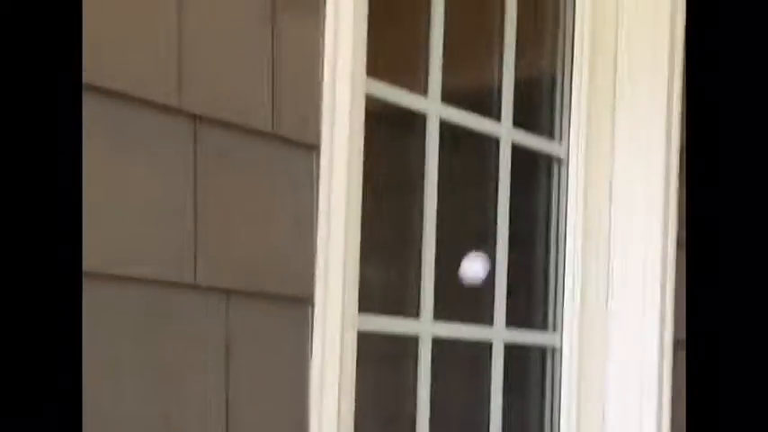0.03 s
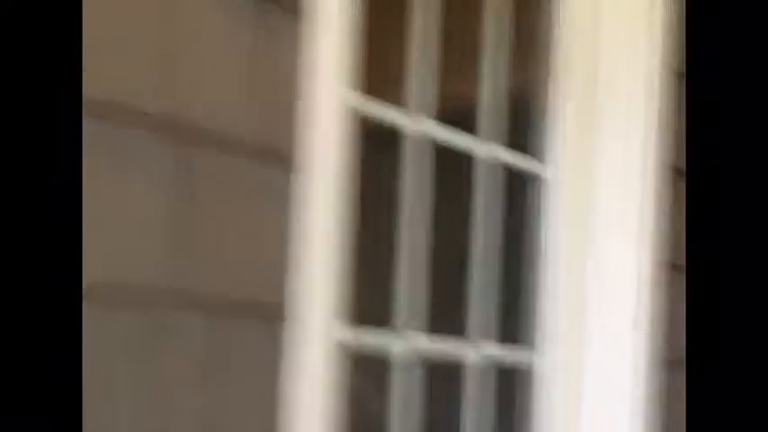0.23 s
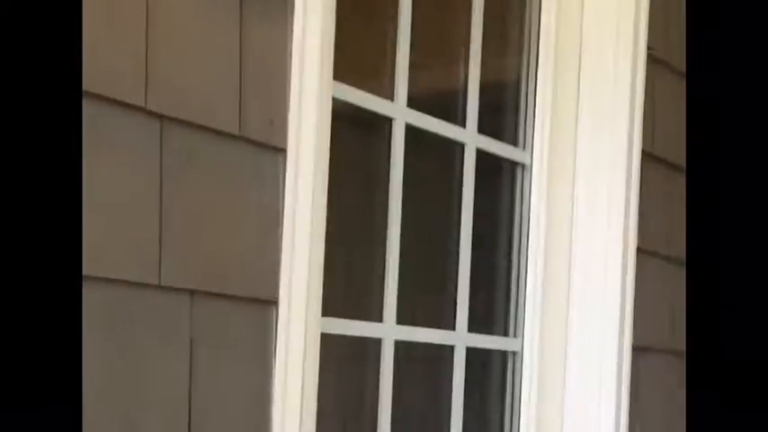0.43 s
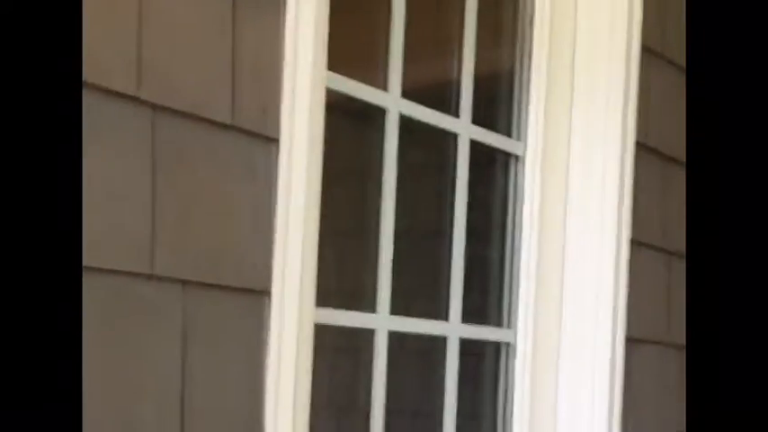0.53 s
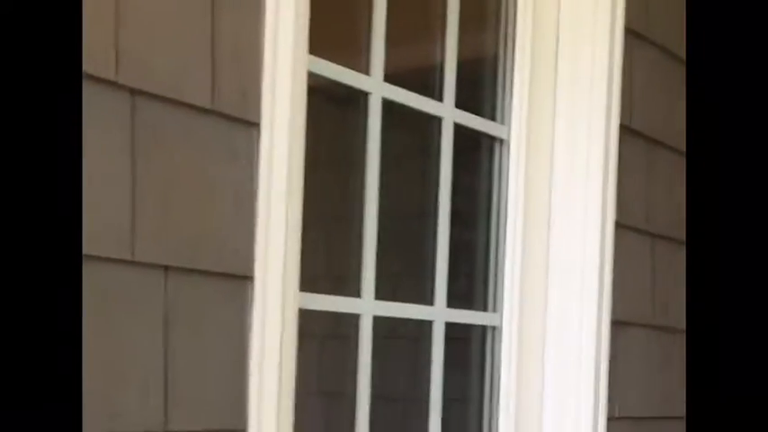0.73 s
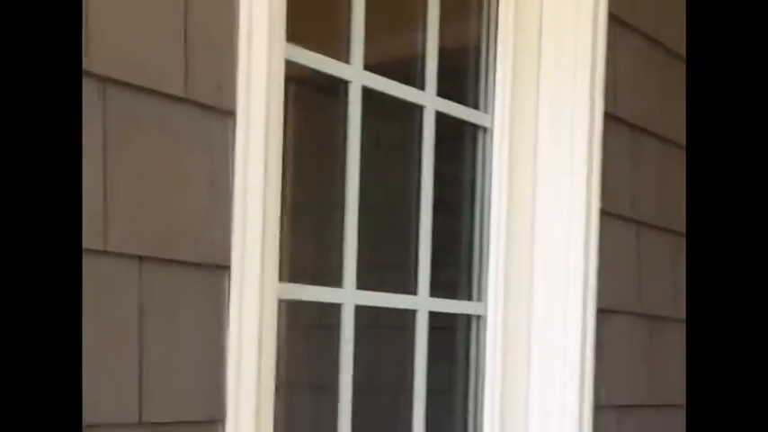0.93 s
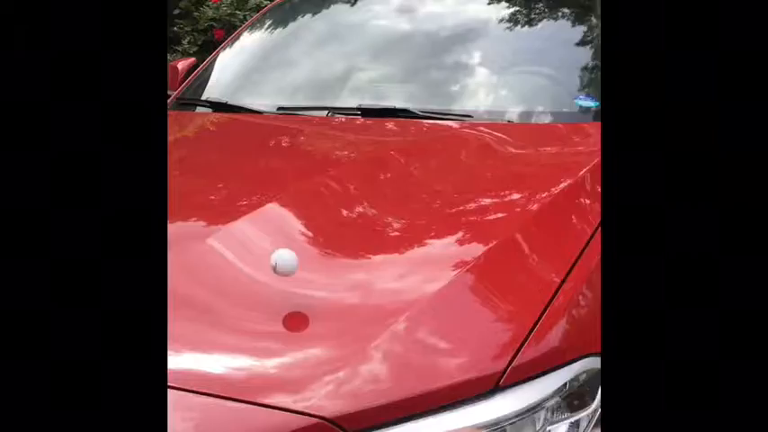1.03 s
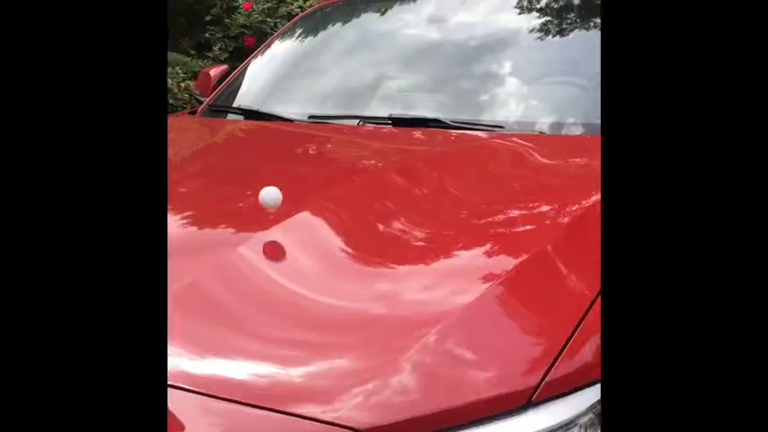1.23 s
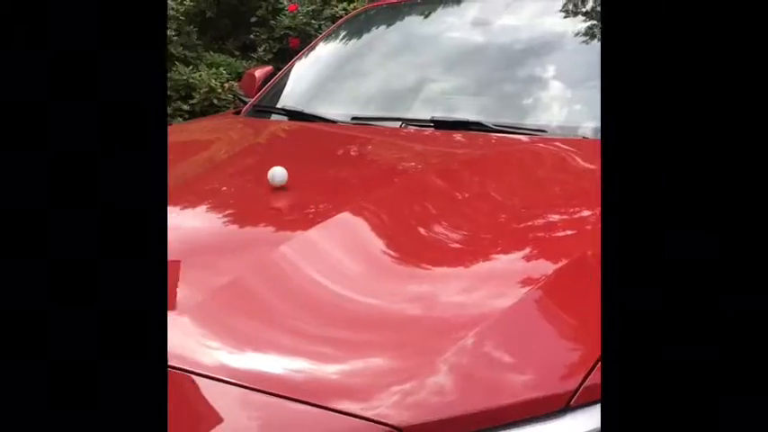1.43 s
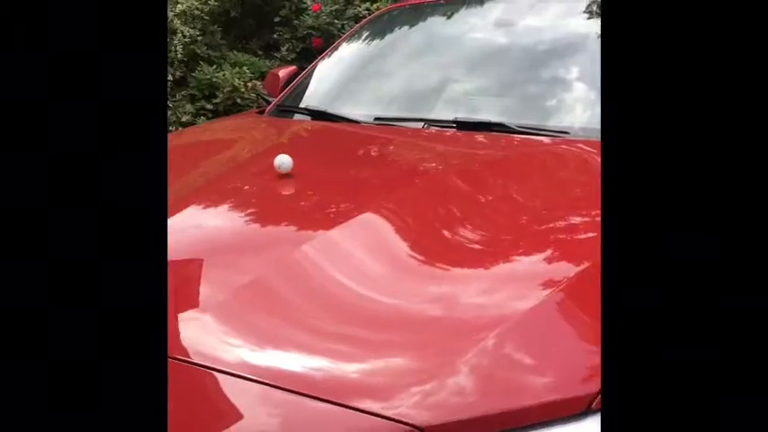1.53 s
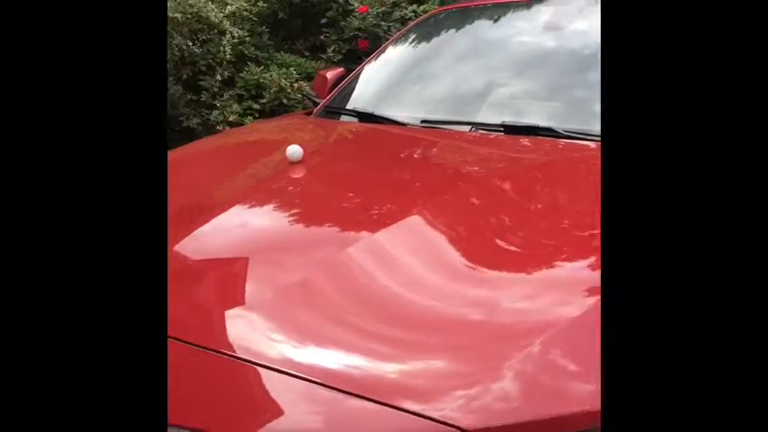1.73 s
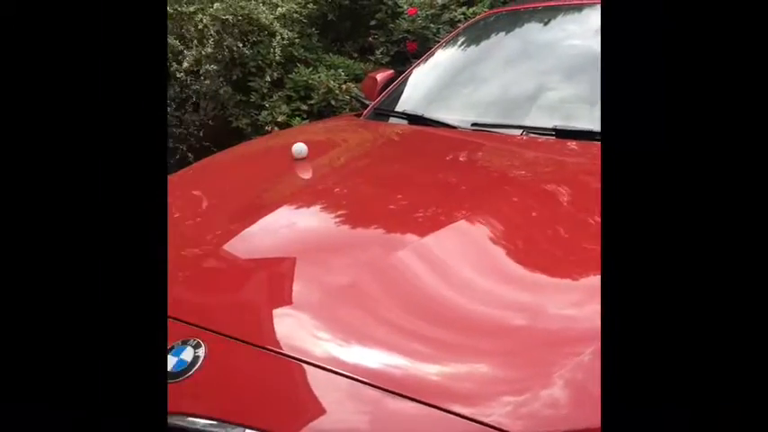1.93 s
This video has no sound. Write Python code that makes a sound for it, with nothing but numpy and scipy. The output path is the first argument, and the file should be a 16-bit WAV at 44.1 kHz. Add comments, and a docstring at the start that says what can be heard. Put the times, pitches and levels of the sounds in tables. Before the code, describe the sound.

A ping-pong ball clicks sharply on a window at 0.2 seconds, and the pane booms with a short porch echo. It clicks more softly on hard ground at 0.75, followed by a faint tick at 1.0. From 1.15 it bounces on a ringing steel car hood, again at 1.4, 1.6 and 1.7, ever quicker and weaker, settling by 1.9. Low outdoor rumble and faint airy hiss lie underneath.

```python
"""Over a low outdoor rumble and a hiss of air, a ping-pong ball clicks on a house window and the pane booms.
It drops on the hard ground of an echoing porch, and a faint tick follows. Then, in the open, a ball
bounces on a car's steel hood, sooner and weaker as it settles. Every contact is a click of the
ball's shell; glass and steel add their own ring."""
import sys
import numpy as np
from scipy import signal
from scipy.fft import rfft, irfft, next_fast_len
from scipy.io import wavfile
from scipy.ndimage import map_coordinates

SR = 44100
rng = np.random.default_rng(int(sys.argv[2]) if len(sys.argv) > 2 else 0)


def dump(signal):
    """Clip the signal to [-1, 1] and save it as 16-bit WAV at the path in sys.argv[1]."""
    limited = np.clip(np.atleast_2d(signal).T, -1, 1)
    pcm = np.round(limited * 32767).astype(np.int16)
    wavfile.write(sys.argv[1], SR, pcm)


N = 88200
PANEL_ATTACK_S = 0.0018  # glass and steel take a moment to bloom


def amp(db):
    """Decibels to gain."""
    return 10 ** (np.asarray(db) / 20)


def along(points, hz):
    """Read a curve of (pitch_hz, value) points on a log frequency axis."""
    pitches, values = np.transpose(points)
    return np.interp(np.log(hz + 1), np.log(pitches + 1), values)


def clock():
    """The time of every sample in seconds."""
    return np.arange(N) / SR


def rise(attack_s):
    """An attack that builds with time constant attack_s."""
    return 1 - np.exp(-clock() / attack_s)


def fade(t, t60):
    """Exponential decay, 60 dB down after t60 seconds."""
    return np.exp(-np.log(1000) * t / t60)


def add(track, start_s, sound):
    """Mix a sound into the track at start_s."""
    start = round(start_s * SR)
    track[start:] += sound[:N - start]


def noise(colour, lift=lambda hz: 1):
    """Coloured noise brought to rms 1, then equalised by the gain curve lift."""
    hz = np.fft.rfftfreq(N, 1 / SR)
    coloured = irfft(rfft(rng.standard_normal(N)) * amp(along(colour, hz)), N)
    coloured /= np.sqrt(np.mean(coloured ** 2) + 1e-20)
    return irfft(rfft(coloured) * lift(hz), N)


def outdoors():
    """A low rumble, stronger by the house, under a faint hiss of air."""
    rumble_levels = [(0, -41.5), (.3, -44), (.62, -43), (.72, -46), (1.0, -43), (1.03, -63.5), (1.3, -57.5),
                     (1.47, -54.5), (1.75, -48.5), (2, -48)]  # time_s, level_db
    rumble_colour = [(20, -38), (36, -17), (52, 1), (82, 2), (115, -11.5), (200, -6), (280, -22),
                     (600, -65.5)]  # pitch_hz, level_db
    air_levels = [(0, -55.5), (1.0, -55.5), (1.05, -55), (1.13, -64), (1.2, -57.5), (1.6, -55.5),
                  (1.9, -58.5), (2, -55)]  # time_s, level_db
    air_colour = [(150, 1), (250, -2), (330, -5), (560, -8), (1050, -11), (2500, -21), (6000, -31.5),
                  (16000, -39.5)]  # pitch_hz, level_db
    fader = lambda levels: amp(np.interp(clock(), *np.transpose(levels)))
    return fader(rumble_levels) * noise(rumble_colour) + fader(air_levels) * noise(air_colour)


def ring(modes, scatter_db, lift=lambda hz: 1):
    """Damped modes of alternating polarity, each a little stronger or weaker at every blow."""
    t = clock()
    out = np.zeros(N)
    for k, (hz, db, t60) in enumerate(modes):
        gain = (-1) ** k * amp(db + scatter_db * rng.standard_normal()) * lift(hz)
        out += gain * fade(t, t60) * np.sin(2 * np.pi * hz * t)
    return out


def ball_click():
    """The ball is pressed flat and puffs the air; its shell rings briefly, with a bright crack."""
    shell_modes = [(2265, -14.5, 0.01), (3130, -3.5, 0.012), (4036, -25, 0.057), (5930, -29.5, 0.094),
                   (6070, -14.5, 0.0075), (8810, -4, .011), (9250, -34, .13), (8800, -35, 0.14),
                   (9700, -11.5, 0.0055), (10750, -8.5, 0.0099), (11930, -6.5, .011),
                   (12750, -15.5, 0.0094), (14300, -22.5, .009)]  # pitch_hz, level_db, t60_s
    crack_colour = [(300, 15), (1300, 13.5), (2800, -16.5), (4500, 4), (6500, -0.5), (9000, -7), (12000, 7),
                    (15000, -9), (16500, -20)]  # pitch_hz, level_db
    contact_s = 0.00076
    t = clock()
    puff = amp(-3) * np.sin(2 * np.pi * t / contact_s) * (t < contact_s)
    crack = amp(1.5) * noise(crack_colour) * fade(t, t60=0.0042)
    shell = ring(shell_modes, scatter_db=1)
    return puff + (shell + crack) * rise(attack_s=0.00016)


def bending_chirp():
    """High bending waves run faster, so a struck sheet opens with a quick falling chirp."""
    start_hz, end_hz, fall_s = 4036, 610, 0.00075
    t = clock()
    hz = end_hz + (start_hz - end_hz) * np.exp(-t / fall_s)
    return np.sin(2 * np.pi * np.cumsum(hz) / SR) * fade(t, t60=0.0096) * rise(attack_s=0.00047)


def mode_wash(colour, decays, lift=lambda hz: 1):
    """Countless overlapping modes in uneven bunches, each frequency dying at its own speed."""
    ripple_db, spacing_hz = 2.5, 170
    bunches = rng.standard_normal(512)
    uneven = lambda hz: lift(hz) * amp(ripple_db * map_coordinates(bunches, [hz / spacing_hz]))
    hz, t, bands = signal.stft(noise(colour, uneven), SR, nperseg=256)
    dying = bands * fade(t, along(decays, hz)[:, None])
    return signal.istft(dying, SR, nperseg=256)[1][:N]


def porch_echo(colour):
    """A click comes back under the porch as dense early scatter and a longer tail."""
    tail_decays = [(300, 0.33), (4000, 0.24), (9000, 0.27), (15000, .22)]  # pitch_hz, t60_s
    early = amp(7) * noise(colour) * fade(clock(), t60=0.034)
    return (early + mode_wash(colour, tail_decays)) * rise(attack_s=0.00084)


def window_knock():
    """The ball clicks on the glass, the pane booms and the porch answers."""
    knock = (.2009, -17, -21.5)  # start_s, click_db, pane_db
    pane_modes = [(194.4, 2.5, 0.45), (218, -22, 0.24), (312.6, -4.5, 0.34), (388, -12, 0.28),
                  (453, -11, .26), (542, -12.5, 0.39), (772, -12, 0.32), (1017, -19, 0.4),
                  (1232, -26, 0.66), (1281, -30, .22), (1422, -24, 0.37)]  # pitch_hz, level_db, t60_s
    wash_colour = [(60, -40), (140, -18.5), (260, 4.5), (600, -3), (1300, -4.5), (1950, -13), (2500, -28.5),
                   (5000, -39), (16000, -72)]  # the pane's weaker modes: pitch_hz, level_db
    wash_decays = [(200, .4), (1000, 0.3), (3000, 0.22)]  # pitch_hz, t60_s
    echo_colour = [(1500, -2), (2500, -9.5), (3200, 0.5), (3700, -15), (4400, 2), (5300, -18.5),
                   (6050, -10), (6700, -17), (8200, -8), (8850, 5), (9600, -15), (10200, -7), (11200, -7),
                   (11950, 2), (12700, -6), (15000, -5), (16500, -28)]  # pitch_hz, level_db
    start_s, click_db, pane_db = knock
    pane = ring(pane_modes, scatter_db=2.5) + mode_wash(wash_colour, wash_decays)
    glass = amp(-20.5) * bending_chirp() + amp(pane_db) * pane * rise(PANEL_ATTACK_S)
    out = np.zeros(N)
    add(out, start_s, amp(click_db) * ball_click() + glass + amp(-36) * porch_echo(echo_colour))
    return out


def ground_bounce():
    """Hard ground does not ring: it leaves the shell's lower modes singing, and the walls reflect the click."""
    bounce = (.7578, -27, -27)  # start_s, click_db, echo_db
    shell_modes = [(2360, -39, 0.12), (4010, -38, .1), (4540, -41.5, 0.2)]  # pitch_hz, level_db, t60_s
    echo_colour = [(150, -34.5), (380, 1), (1400, -2.5), (2300, 0.5), (3200, -12.5), (3700, -0.5),
                   (4200, 0), (5000, -11), (6700, -7), (8000, -17), (8850, 9), (9450, -9.5), (9900, 2.5),
                   (10500, -7), (11150, 2), (12300, -2), (13500, -7.5), (15500, -11), (16500, -28)]  # pitch_hz, level_db
    wall_reflections = [(.0009, 3), (.0023, -4), (.0034, -8), (.0044, -7.5), (.0079, -5.5)]  # delay_s, gain_db
    start_s, click_db, echo_db = bounce
    click = amp(click_db) * ball_click()
    shell = ring(shell_modes, scatter_db=3)
    out = np.zeros(N)
    add(out, start_s, click + shell + amp(echo_db) * porch_echo(echo_colour))
    for delay_s, gain_db in wall_reflections:
        add(out, start_s + delay_s, amp(gain_db) * click)
    return out


def faint_tick():
    """One dull little burst of noise after the ground bounce."""
    tick = (1.0205, -49.5, 0.032)  # start_s, level_db, t60_s
    tick_colour = [(200, -19), (1300, 13), (2500, -13), (6000, -20), (16000, -20)]  # pitch_hz, level_db
    start_s, level_db, t60 = tick
    out = np.zeros(N)
    add(out, start_s, amp(level_db) * noise(tick_colour) * fade(clock(), t60))
    return out


def hood_bounces():
    """Each bounce clicks and clacks, pocks the spot under it and rings the whole steel sheet anew."""
    bounces = [(1.1500, -18, -22.5, -24, 5, 1240, -25.5), (1.4165, -22.5, -20, -27, -14, 755, -18.5),
               (1.5885, -24.5, -25, -30.5, 2, 316, -24), (1.6974, -30, -29, -36, 3, 908, -36),
               (1.7577, -44.5, -32.5, -39.5, 1, 910, -43), (1.7920, -51.5, -43.5, -46, 2.5, 855, -51),
               (1.8148, -59, -52.5, -48, -6, 819, -44.5), (1.8556, -65.5, -65, -52, 2, 877, -58)]  # start_s, click_db, clack_db, panel_db, bass_db, spot_hz, spot_db
    panel_modes = [(179, -18, 0.46), (283.3, -5.5, 0.37), (316.4, -11.5, 0.54), (356, -5.5, 0.3),
                   (393, -12.5, 0.38), (439, -48, 0.14), (560, -15, 0.18), (584, -17.5, 0.55),
                   (643, -7, 0.39), (786, -24, 0.2), (842, -8, 0.3), (962.5, -5.5, 0.19), (1130, -17, 0.2),
                   (1290, -16, 0.072)]  # the hood's clearest tones: pitch_hz, level_db, t60_s
    wash_colour = [(90, -18), (170, -8.5), (280, -2.5), (480, -3.5), (750, -2), (1300, -6.5), (1800, -17),
                   (2200, -19), (2900, -23), (5000, -36), (16000, -48)]  # its weaker modes: pitch_hz, level_db
    wash_decays = [(250, .55), (800, 0.27), (1500, 0.2), (4000, 0.1)]  # pitch_hz, t60_s
    spot_modes = [(.85, -3, 0.12), (1, 0.5, 0.054), (1.11, -5, 0.067), (1.27, -8.5, 0.05)]  # hollow pock of the steel under the ball: pitch_ratio, level_db, t60_s
    clack_modes = [(2337, -4, 0.016), (2684, -3.5, 0.011), (2880, -22, 0.065), (3430, -8.5, 0.0078)]  # hard, dry tick of the steel itself: pitch_hz, level_db, t60_s
    yard_colour = [(1500, -13), (3500, 7), (5000, -3), (7500, -5), (8800, -2), (9600, -3), (11800, -2),
                   (14000, -7.5), (16000, -20)]  # faint scatter round the car: pitch_hz, level_db
    shelf_hz = 370.4  # below this the hood's answer depends on where the ball lands
    out = np.zeros(N)
    for start_s, click_db, clack_db, panel_db, bass_db, spot_hz, spot_db in bounces:
        shelf = lambda hz: amp(bass_db / (1 + (hz / shelf_hz) ** 4))
        panel = ring(panel_modes, scatter_db=2, lift=shelf)
        panel += amp(2) * mode_wash(wash_colour, wash_decays, shelf)
        pock = ring([(spot_hz * ratio, db, t60) for ratio, db, t60 in spot_modes], scatter_db=3.5)
        steel = (amp(panel_db) * panel + amp(spot_db) * pock) * rise(PANEL_ATTACK_S)
        yard = amp(-34) * noise(yard_colour) * fade(clock(), t60=0.25)
        contact = ball_click() + amp(4) * bending_chirp() + yard
        clack = ring(clack_modes, scatter_db=1.5)
        add(out, start_s, amp(click_db) * contact + amp(clack_db) * clack + steel)
    return out


def scene():
    """All contacts over the outdoor bed, in mono."""
    return (window_knock() + ground_bounce() + faint_tick() + hood_bounces() + outdoors())[None]


def record(dry):
    """A gentle low cut thins the deepest bass; a steep high cut removes the very top."""
    low_cut_hz, high_cut_hz = 53, 16000
    thinned = signal.sosfilt(signal.butter(2, low_cut_hz, "highpass", fs=SR, output="sos"), dry)
    padded = next_fast_len(N + SR // 2)
    hz = np.fft.rfftfreq(padded, 1 / SR)
    high_cut = 1 / np.sqrt(1 + (hz / high_cut_hz) ** 160)
    return irfft(rfft(thinned, padded) * high_cut, padded)[..., :N]


dry = scene()
out = record(dry)
dump(out)
```